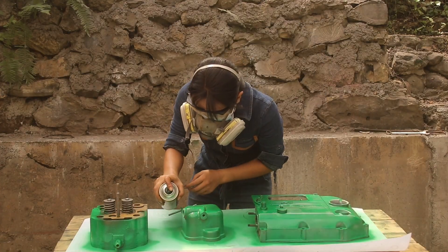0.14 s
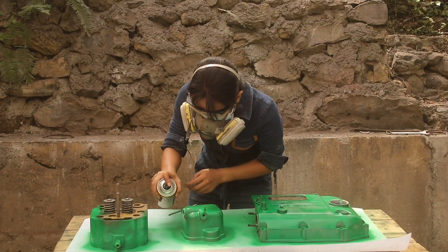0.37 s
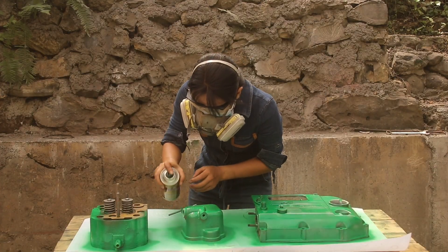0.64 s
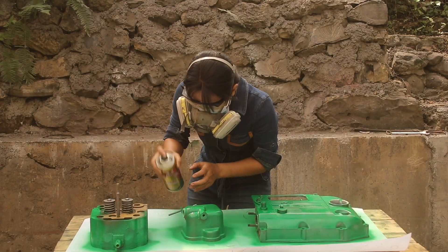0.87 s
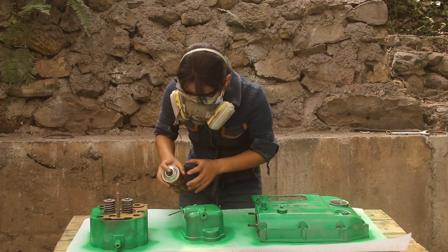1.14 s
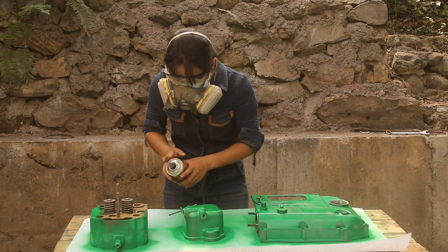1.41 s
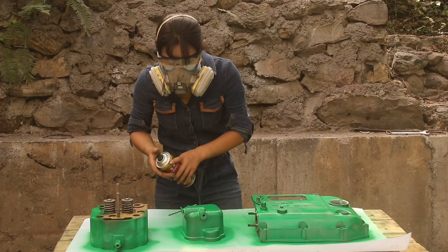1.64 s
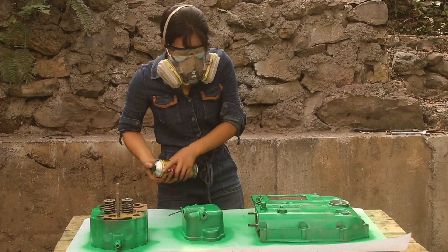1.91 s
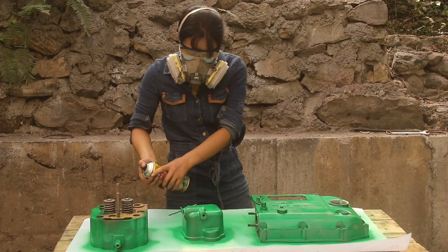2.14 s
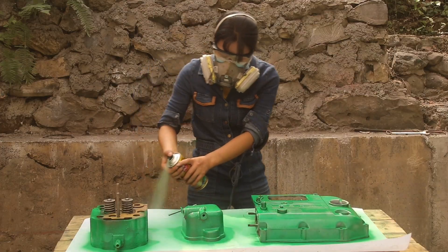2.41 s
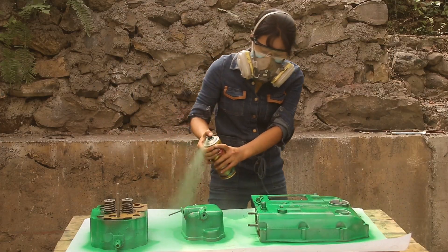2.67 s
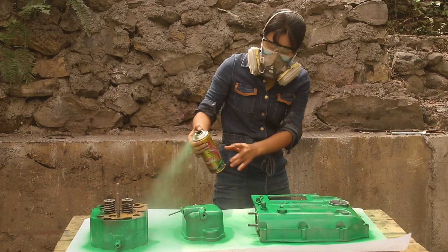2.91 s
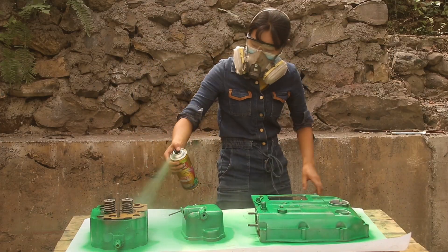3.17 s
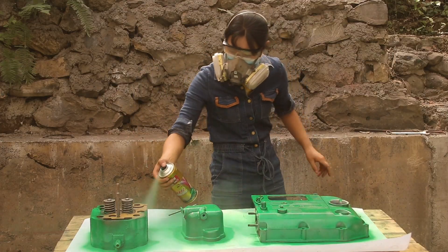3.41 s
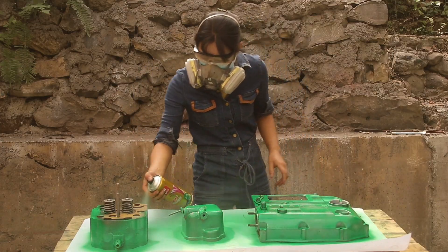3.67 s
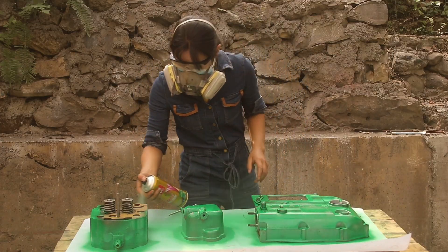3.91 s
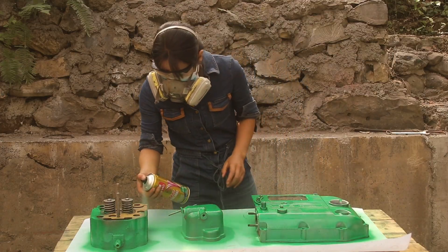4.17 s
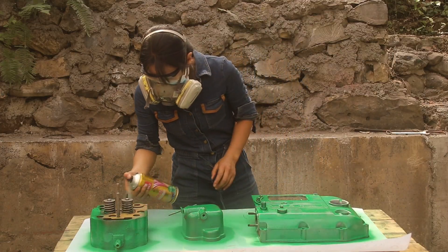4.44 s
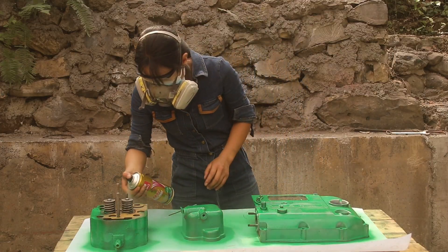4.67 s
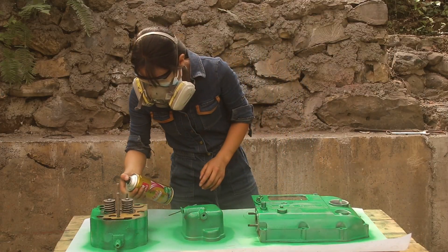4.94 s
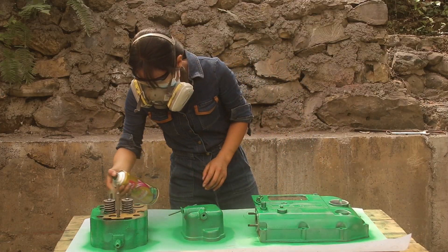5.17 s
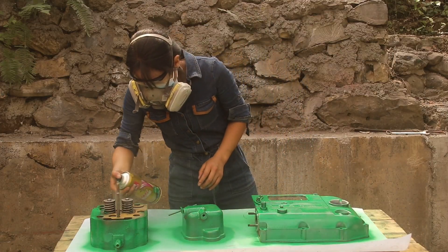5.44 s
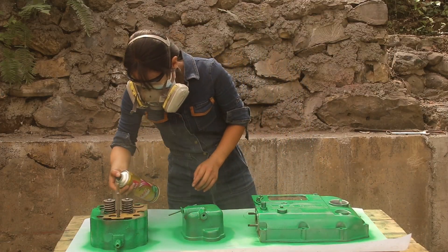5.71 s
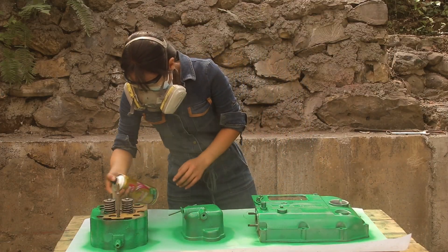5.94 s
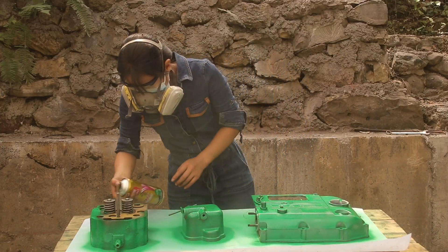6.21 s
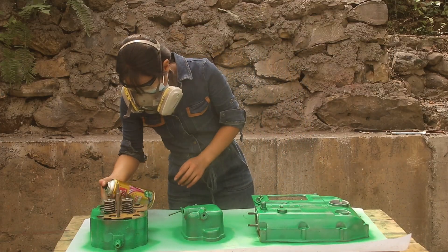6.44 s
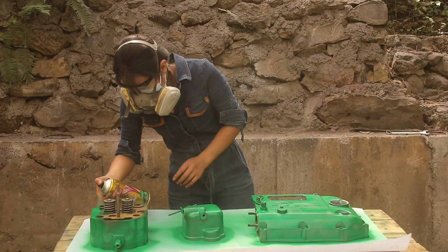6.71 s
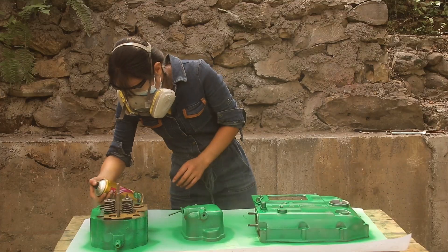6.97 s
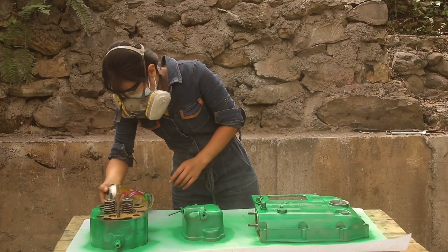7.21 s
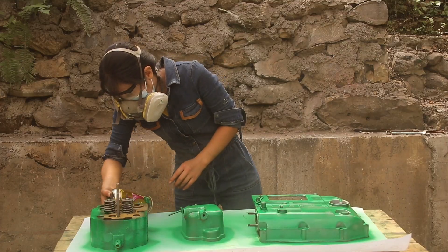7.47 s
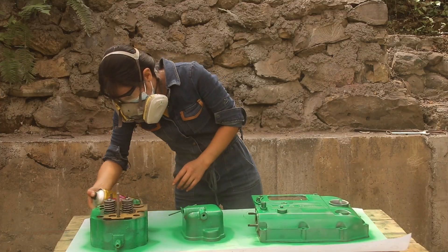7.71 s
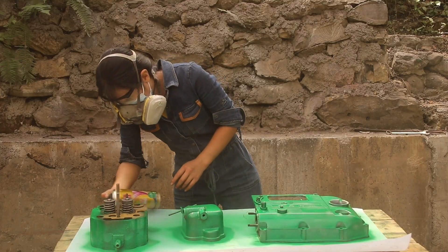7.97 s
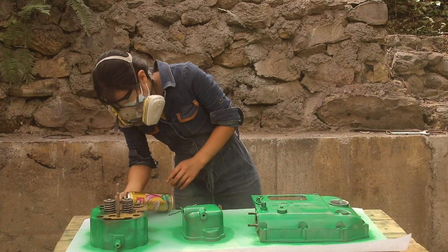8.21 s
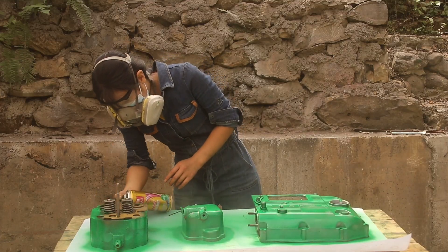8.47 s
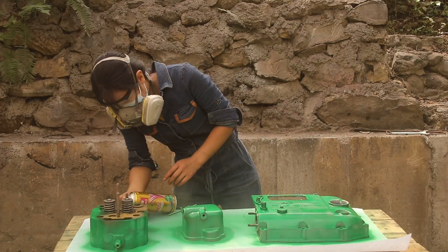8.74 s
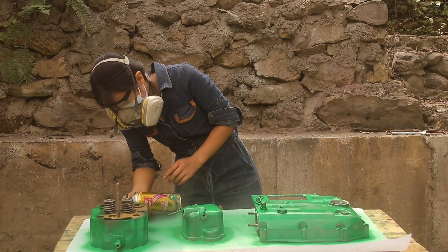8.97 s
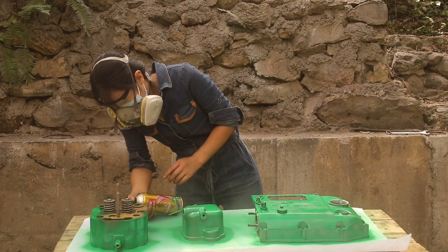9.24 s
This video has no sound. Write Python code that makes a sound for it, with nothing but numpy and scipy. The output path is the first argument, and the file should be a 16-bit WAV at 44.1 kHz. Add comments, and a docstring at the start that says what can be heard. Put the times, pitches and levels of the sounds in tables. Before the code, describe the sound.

Outdoors by a stone wall, a faint hiss gives way to an aerosol can being shaken: the steel ball knocks, skids and rolls in the thin shell. After a brief lull the spray opens in steps into a steady bright hiss with small hollow gulps. Then irregular ball clacks return and continue over the hiss to the end. Close stereo microphone, short rough echoes, quiet low rumble.

```python
"""A faint hiss, then the mixing ball knocks, skids and rolls inside a spray can of paint.
The hiss drops very low, returns in steps and goes on over more knocks. Ringing modes and short noises
make the ball; noise in bands makes the spray. A table and a stone wall answer with echoes; below lie a
quiet outdoor rumble, a faint steady microphone hiss and a wavering hum."""
import sys
import numpy as np
from scipy import signal
from scipy.io import wavfile
from scipy.ndimage import map_coordinates

SR = 44100
rng = np.random.default_rng(int(sys.argv[2]) if len(sys.argv) > 2 else 0)


def natural_amplitude(level_db):
    """Convert a level in decibels to a linear amplitude factor, elementwise."""
    exponent = np.asarray(level_db, float) / 20
    return 10 ** exponent


def output_pcm(signal):
    """Save a mono or channel-first signal as 16-bit PCM at the path in sys.argv[1].

    Samples are clipped to [-1, 1] before scaling.
    """
    pcm = np.clip(np.atleast_2d(signal).T, -1, 1) * 32767
    wavfile.write(sys.argv[1], SR, np.round(pcm).astype(np.int16))


N = 412776  # length in samples

# Middle pitches of the six bands in which every knock is described. A plain list [Hz].
KNOCK_BANDS_HZ = [1250, 2050, 2750, 3600, 5000, 7500]
# How alike the spray hiss is left and right. Each row: pitch in Hz, likeness (1 = the same, 0 = unrelated).
SPRAY_LIKENESS = [(60, 0.42), (180, 0.24), (550, 0.86), (1650, 0.87), (4970, 0.31), (15000, 0.28)]
# How alike rumble and steady hiss are left and right. Each row: pitch in Hz, likeness (1 = the same, 0 = unrelated).
BACKGROUND_LIKENESS = [(60, 0.46), (180, 0.53), (550, 0.88), (1650, 0.03), (4970, 0.11), (15000, 0.088)]


def rms_one(x):
    """Scale to an average strength (rms) of 1."""
    return x / np.sqrt(np.mean(x ** 2) + 1e-20)


def in_time(rows):
    """Draw straight lines between the rows of a table, giving each column sample by sample."""
    s, *columns = np.transpose(rows)
    return [np.interp(np.arange(N) / SR, s, c) for c in columns]


def at_hz(points, hz):
    """Read a table between its pitches, which are spaced as the ear hears them (by ratio)."""
    table_hz, values = np.array(points)[:, 0], np.array(points)[:, 1]
    return np.interp(np.log(hz), np.log(table_hz), values)


def drift(rate_hz):
    """Slow random wandering of rms 1: noise smoothed to below about rate_hz."""
    step = 40  # samples from one drawn point to the next
    r = np.exp(-2 * np.pi * step * rate_hz / SR)
    points = rng.standard_normal(N // step + 2002)
    slow = signal.lfilter([1], [1, -2 * r, r * r], points)[2000:]
    return np.interp(np.arange(N) / step, np.arange(len(slow)), rms_one(slow))


def ring(force, hz, t60):
    """A resonance: a click of size 1 starts a sine of height 1 that falls by 60 dB in t60 seconds."""
    r, w = natural_amplitude(-60 / (t60 * SR)), 2 * np.pi * hz / SR
    return signal.lfilter([0, np.sin(w)], [1, -2 * r * np.cos(w), r * r], force + 1e-18)


def fade(clicks, t60):
    """Every click starts an envelope that falls by 60 dB in t60 seconds."""
    return signal.lfilter([1], [1, -natural_amplitude(-60 / (t60 * SR))], clicks + 1e-18)


def banded_noise(spectrum, likeness, patchy_db, count):
    """Stereo noise of rms 1 in bands (count an octave), each with its own level, flicker and likeness."""
    low_hz, high_hz = spectrum[0][0], min(spectrum[-1][0], 16500)
    edges = low_hz * 2 ** np.arange(0, np.log2(high_hz / low_hz) + .2, 1 / count)
    out, together, white = 0, drift(2.7), rng.standard_normal((2, 2, N))
    for k, (low, high) in enumerate(zip(edges, edges[1:])):
        band = signal.butter(2, [low, high], "band", fs=SR, output="sos")
        mid, side = signal.sosfilt(band, white[k % 2])
        hz = np.sqrt(low * high)
        alike = np.clip(at_hz(likeness, hz), -1, 1)
        flicker_db = patchy_db * (1.07 * together + drift(21))
        gain = natural_amplitude(at_hz(spectrum, min(hz, 15000)) + flicker_db)
        out = out + gain * (np.sqrt(1 + alike) * mid + np.sqrt(1 - alike) * side * [[1], [-1]])
    return rms_one(out)


def grains(per_s, spread_db):
    """Tiny contacts of uneven size at random moments, per_s a second on average; rms 1."""
    sizes = natural_amplitude(spread_db * np.minimum(rng.exponential(1, N), 5)) * rng.choice([-1, 1], N)
    return rms_one(sizes * (rng.random(N) < per_s / SR))


def mixing_ball():
    """The steel ball hits the shell, skids on and rolls; the small can radiates little bass."""
    at, bands_db, crack_db = knocks()
    ringing, rolling = shell_modes(at, bands_db)
    push = np.zeros(N)
    push[at] = natural_amplitude(bands_db.max(axis=1))
    # after a knock the ball rolls on and slows down
    roll_dull_db, roll_bright_db, roll_t60 = -25, -30, 0.77
    dull, bright = fade(push, roll_t60) * natural_amplitude(np.array([[roll_dull_db], [roll_bright_db]])) + scrapes()
    out = ringing + cracks_and_clatter(at, bands_db, crack_db)
    out += dull * rms_one(rolling[0]) + bright * rms_one(rolling[1])
    return signal.sosfilt(signal.butter(3, 360, "high", fs=SR, output="sos"), out)


def knocks():
    """All hits of the ball: sample positions, ringing in the six bands (dB), crack over ringing (dB)."""
    # Ball on the side wall. Each row: time in seconds (sounds 1 ms later),
    # then ringing in dB near 1250, 2050, 2750, 3600 and 7500 Hz.
    wall_table = [(0.6009, -20.5, -24, -22.5, -34, -22), (0.6566, -31, -34, -29, -35, -30),
                  (0.6946, -35, -34, -39.0, -33, -35), (0.7293, -51, -36, -47, -34, -35),
                  (0.848, -37, -45, -61.0, -58.5, -55.0), (0.9007, -15, -24.5, -26, -24.5, -18.5),
                  (0.9693, -33, -23.5, -41, -25.5, -21.5), (1.0208, -26.5, -24, -42, -30.5, -38),
                  (1.049, -44, -34, -49, -44, -37), (1.064, -35, -31, -29.5, -30, -37),
                  (1.196, -20, -26, -21.0, -38, -20), (1.2407, -37, -20.5, -50, -24, -24),
                  (1.3909, -31.0, -19, -28, -24, -27.5), (1.4315, -25, -23, -59, -36, -32.5),
                  (1.4525, -34, -26, -46, -25.5, -35), (1.5168, -40, -29, -46.0, -27.5, -39),
                  (1.5359, -25.5, -27, -28, -43, -26.5), (1.594, -49, -37, -42, -40, -34),
                  (1.6259, -25, -28.5, -50, -21.5, -33), (1.6417, -40, -29.0, -40, -26.5, -24),
                  (1.7673, -29.5, -31, -38, -27.5, -31.5), (1.8918, -57, -41, -45, -35, -39.5),
                  (3.742, -28, -30, -34.5, -29.5, -32), (3.7722, -33, -22, -32.5, -23, -22),
                  (3.843, -46.5, -28, -32, -26.5, -40), (3.877, -35, -26, -31, -27, -31),
                  (4.0211, -23.5, -24, -29, -31.5, -21.5), (4.0411, -35, -49, -47, -28, -20),
                  (4.0883, -56, -24.5, -38, -33, -51), (4.1804, -52.5, -31, -44, -32, -50.5),
                  (4.245, -38, -32, -36, -41, -23.5), (4.3118, -46, -38, -42, -23, -21.5),
                  (4.333, -53, -25.5, -49, -29, -34), (4.3811, -34, -47.0, -28, -34, -32),
                  (4.397, -47.0, -40, -41, -36, -26.5), (4.5968, -27, -23, -24.5, -26.0, -18),
                  (4.6431, -27, -27, -30, -22.5, -26), (4.867, -24, -28, -25, -25, -20),
                  (4.8838, -28, -30, -26, -34, -33), (4.939, -41, -26, -32.5, -25.5, -26.5),
                  (5.0125, -34.5, -28, -32, -32, -25.5), (5.0846, -46, -28, -43.5, -34, -32),
                  (5.316, -32, -20.5, -29, -25, -21.5), (5.3755, -25, -18, -23, -28, -21.5),
                  (5.4285, -27, -48, -30, -26, -35), (5.458, -29.5, -26, -44, -31, -43),
                  (5.5494, -20.5, -26.5, -29, -26, -19), (5.6379, -23.5, -26, -30, -23, -29),
                  (5.698, -41, -24.5, -30, -25, -30), (5.7773, -30, -27, -24, -33, -19.5),
                  (5.8217, -41, -29.5, -24, -32, -26), (5.8473, -28, -26, -28, -29, -21),
                  (5.8874, -32.5, -33, -26.5, -25, -36), (6.1243, -44, -17, -22, -34.5, -21.5),
                  (6.132, -23, -32, -24, -22, -25), (6.4129, -24, -22.5, -24, -42, -19.5),
                  (6.4369, -31, -30, -23.5, -25, -28.5), (6.4956, -28, -23, -28, -39, -31),
                  (6.5468, -29, -42, -33, -39, -48), (6.6738, -24, -23, -19, -26, -17.5),
                  (6.7117, -23.5, -30, -42, -31, -30), (6.7407, -25.5, -28, -25, -27, -37),
                  (6.7945, -25.5, -29, -26, -29, -34), (6.8698, -37, -28, -23.5, -34, -24),
                  (6.9308, -39, -25, -32, -35, -35), (6.9724, -22.5, -24, -22, -23, -23),
                  (7.0244, -35.0, -26, -33, -31, -36), (7.0686, -30, -28, -32, -34, -35),
                  (7.2405, -28, -20, -24.5, -28.5, -21), (7.2882, -23.5, -18.5, -27, -25, -26),
                  (7.3475, -28, -33.5, -27, -28, -36), (7.406, -26.5, -32, -38, -36, -40),
                  (7.448, -20, -20.5, -24, -24, -30), (7.548, -25, -26.5, -21, -37, -22),
                  (7.6646, -28, -27.5, -29, -30, -46), (7.724, -35, -38, -48, -40, -33),
                  (7.8177, -28.5, -27, -41, -26.5, -36), (7.9121, -38.5, -21.5, -29, -36, -20),
                  (7.9726, -26.5, -30.5, -30, -31, -42), (8.025, -30, -17.5, -30, -20.5, -18),
                  (8.0572, -48, -23, -24, -41, -41), (8.1524, -24.5, -26.5, -33, -28, -31.5),
                  (8.198, -23, -20, -23, -28, -15), (8.2819, -24, -25, -30, -22.5, -30),
                  (8.3188, -42, -25, -26, -37, -36), (8.335, -36.5, -32, -32, -32, -34),
                  (8.7274, -31.5, -21, -27.5, -31, -25), (8.7877, -40, -26, -37, -31, -21),
                  (8.8223, -34, -31, -33, -34, -40), (8.9208, -38, -20.5, -27, -33, -22),
                  (8.9792, -35, -28, -34, -29, -56), (9.0257, -37, -37, -40, -36, -47),
                  (9.1986, -51, -29, -38, -35, -24.5), (9.2043, -56, -26, -34, -48, -50),
                  (9.283, -47.5, -29, -43, -52, -35.5), (9.3037, -54, -43, -41, -34, -30)]
    # Ball on the domed bottom, hard and bright. Each row: time in seconds (sounds 1 ms later),
    # then ringing in dB near 1250, 2050, 2750, 3600, 5000 and 7500 Hz.
    dome_table = [(1.1304, -31, -33, -25, -30, -16, -21), (5.0976, -36, -30, -28, -20.5, -25, -26),
                  (7.1523, -49.5, -26, -38, -20.5, -23, -29.5), (7.7628, -40, -21, -28, -27, -28, -23),
                  (7.7695, -40, -28, -34, -31, -30, -25), (9.0455, -52, -39, -52, -47, -38, -30)]
    wall, dome = np.array(wall_table), np.array(dome_table)
    wall = np.insert(wall, 5, wall[:, 4] - 9, axis=1)  # 5000 Hz: 9 dB weaker than 3600 Hz
    rows = np.r_[wall, dome]
    wall_crack_db, dome_crack_db = -1.5, 8  # the stiff dome cracks harder
    crack_db = np.repeat([wall_crack_db, dome_crack_db], [len(wall), len(dome)])
    return np.round((rows[:, 0] + .001) * SR).astype(int), rows[:, 1:], crack_db


def shell_modes(at, bands_db):
    """Knocks and skids ring the shell's modes; rolling contacts ring them too, as dull and bright parts."""
    # Steel shell damped by paint and hand. Each row: pitch in Hz, level in dB,
    # time to fall by 60 dB in seconds (before the limits below).
    shell = [(450, -25, 0.14), (829, -25, 0.27), (1133, -34, 0.16), (1217, -22, 0.05), (1358, -15, 0.023),
             (1532, -16, 0.03), (1725, -16, 0.042), (1973, -11.5, 0.044), (2145, -7.5, 0.031),
             (2400, -15, 0.02), (2680, -11, 0.032), (2990, -8.5, 0.016), (3260, -9.5, 0.018),
             (3640, -9.5, 0.027), (4270, -7.5, 0.012), (4910, -11.5, 0.044), (5160, -12, 0.019),
             (5970, -14.5, 0.038), (6580, 4.5, 0.0054), (7140, 0.5, 0.0091), (7550, -2, 0.011),
             (8800, 7.5, 0.0013), (10100, -8.5, 0.03), (12660, -7.5, 0.0045)]
    skid_db, skid_t60, uneven_db, split = -28.5, 0.12, 5.0, .005  # split: share of the pitch
    chance = rng.standard_normal((len(at), len(shell), 2))
    skid, roll = grains(1500, 3), grains(2500, 3) * natural_amplitude(3 * drift(25))
    out, rolling = np.zeros(N), np.zeros((2, N))
    for k, (hz, db, t60) in enumerate(shell):
        t60 = min(t60, .09, 230 / hz)  # high modes die within a few hundred cycles
        colour = np.array([np.interp(np.log(hz), np.log(KNOCK_BANDS_HZ), row) for row in bands_db])
        for twin, side in enumerate([-1, 1]):  # seam and paint split each mode into a beating pair
            twin_hz = hz * (1 + side * split)
            blows = np.zeros(N)
            blows[at] = natural_amplitude(colour + db + uneven_db * chance[:, k, twin])
            force = blows * (-1) ** k + natural_amplitude(skid_db) * skid * fade(blows, skid_t60)
            out += ring(force, twin_hz, t60)
            rolling[int(hz > 4500)] += natural_amplitude(db) * ring(roll, twin_hz, t60)
    return out, rolling


def cracks_and_clatter(at, bands_db, crack_db):
    """In each band a very short ring as the crack, and grainy noise for modes too dense to tell apart."""
    # Bands of the grainy noise. Each row: lower edge in Hz, upper edge in Hz.
    clatter_bands = [(900, 1550), (1850, 2280), (2450, 3050), (3350, 3850), (4650, 5450), (6200, 14000)]
    clatter_db, crack_cycles, low_crack_db = -1, 7.2, -4.5  # the lowest band starts more softly
    clatter_t60 = [0.021, 0.028, 0.052, 0.058, 0.1, 0.029]  # seconds, band by band
    strongest = bands_db.max(axis=1)
    out = np.zeros(N)
    for band, (hz, t60) in enumerate(zip(KNOCK_BANDS_HZ, clatter_t60)):
        crack, burst = np.zeros((2, N))
        crack[at] = natural_amplitude(crack_db + .75 * bands_db[:, band] + .25 * strongest)
        out += (-1) ** band * natural_amplitude(low_crack_db * (band == 0)) * ring(crack, hz, crack_cycles / hz)
        burst[at] = natural_amplitude(bands_db[:, band] + clatter_db)
        band_filter = signal.butter(2, clatter_bands[band], "band", fs=SR, output="sos")
        crowd = signal.sosfilt(band_filter, grains(2500, 3.2))
        out += rms_one(crowd) * fade(burst, t60)
    return out


def scrapes():
    """The ball scrapes hard along the wall: loudness of rolling noise with sudden start and short release."""
    # Each row: start in seconds, length in seconds, level of the dull modes in dB, of the bright modes in dB.
    scrape_table = [(0.733, 0.11, -54, -57), (1.163, 0.042, -34.5, -36), (1.249, 0.04, -32.5, -29.5),
                    (1.448, 0.03, -45, -41), (1.652, 0.04, -43, -39), (4.09, 0.046, -70, -66),
                    (4.32, 0.03, -46, -58), (5.81, 0.15, -41.5, -42), (6.212, 0.15, -59, -57),
                    (7.56, 0.057, -27, -23), (7.9, 0.029, -25, -50), (9.235, 0.034, -39, -51)]
    t, release_s = np.arange(N) / SR, 0.0057
    gains = np.zeros((2, N))
    for s, length, *db in scrape_table:
        shape = (t > s) * np.exp(-np.maximum(t - s - length, 0) / release_s)
        gains += natural_amplitude(np.array(db))[:, None] * shape
    return gains


def pings():
    """One mode of the shell sings out, as grip and paint let it: struck once and rubbed on for a moment."""
    # Each row: start in seconds, level in dB, pitch in Hz.
    ping_table = [(.6095, -28, 2236), (0.6563, -18.5, 6780), (.745, -37, 1380), (.765, -42, 1300),
                  (.785, -41, 1184), (1.0201, -31.5, 1900), (1.0211, -31, 3550), (1.045, -33.5, 1350),
                  (1.0645, -25.5, 1990), (1.0655, -30, 3630), (1.1558, -26, 1995), (1.2426, -22, 2010),
                  (1.2411, -38, 3640), (1.277, -26, 2000), (1.292, -22, 3640), (1.3904, -43, 2000),
                  (1.4541, -26, 3640), (1.5174, -34, 3640), (1.6267, -40, 3630), (1.7664, -31, 3770),
                  (4.0874, -33, 2000), (4.2567, -33, 2155), (4.3326, -30, 2180), (4.604, -25, 2135),
                  (4.869, -24.5, 2130), (4.869, -31, 3770), (5.014, -22.5, 2085), (5.46, -30, 2010),
                  (6.4378, -20, 3270), (6.7141, -29, 3340), (6.935, -31.5, 2140), (7.07, -34, 1310),
                  (7.105, -35, 1286), (7.156, -26.5, 2114), (7.7684, -33.5, 2160), (7.9, -25, 2110),
                  (8.0571, -27, 2023), (8.203, -24, 1917), (8.285, -26, 3640), (8.7264, -21, 2180),
                  (8.7874, -24, 2160), (8.824, -35, 2025), (8.9226, -22, 2170), (8.981, -28, 2040),
                  (9.1984, -21, 2183)]
    cycles, skid_db = 120, -11  # cycles to die away; small contacts keep the mode alive and rough
    out, size = np.zeros(N + SR), round(.3 * SR)
    shape = (len(ping_table), size)
    rubs = rng.standard_normal(shape) * (rng.random(shape) < .03)
    for (s, db, hz), rub in zip(ping_table, rubs):
        blow = np.zeros(size)
        blow[0] = natural_amplitude(db)
        force = blow + natural_amplitude(skid_db) * rub * fade(blow, 0.098)
        i = round(s * SR)
        out[i:i + size] += ring(force, hz, min(cycles / hz, .13))
    return out[:N]


def broadband_clicks():
    """Very short broadband clicks with some bass, as where a loud knock overloads the microphone."""
    # Each row: start in seconds, level in dB.
    click_table = [(0.6019, -16), (0.9022, -13), (0.9717, -10), (1.1315, -8.5), (4.0222, -17), (4.598, -15),
                   (4.886, -14), (5.0992, -13), (6.1255, -18), (6.1335, -13), (6.6748, -13), (7.7634, 0.5),
                   (8.0277, -9.5)]
    clicks = np.zeros(N)
    for s, db in click_table:
        clicks[round(s * SR)] = natural_amplitude(db)
    return ring(clicks, hz=5400, t60=.0018)


def slosh():
    """Hollow gulps, probably paint shifting in the can, and dull bumps: swelling, fading, wobbly sines."""
    # Gulps. Each row: start in seconds, level in dB.
    gulp_table = [(2.587, -28.5), (2.789, -26), (2.821, -27), (2.859, -31.5), (2.895, -30)]
    # The two hollow pitches of a gulp. Each row: pitch in Hz (before a random shift), level in dB.
    gulp_pitches = [(440, 0), (770, -4)]
    # Bumps. Each row: start in seconds, level in dB, top pitch in Hz.
    bump_table = [(6.662, -21, 401.5)]
    # The tones of a bump. Each row: share of the top pitch, level in dB.
    bump_body = [(0.96, -1), (0.5, -10), (0.66, -15)]
    rise_s, t60, gulp_spread = 0.01, 0.1, .11  # spread: share by which gulp pitches stray
    out, t = np.zeros(N), np.arange(round(.12 * SR)) / SR
    tones = [(s, db + less_db, hz * (1 + gulp_spread * rng.standard_normal()))
             for s, db in gulp_table for hz, less_db in gulp_pitches]
    tones += [(s, db + less_db, hz * share) for s, db, hz in bump_table for share, less_db in bump_body]
    swell = (1 - np.exp(-t / rise_s)) * natural_amplitude(-60 * t / t60)
    for s, db, hz in tones:
        wobble = 1.68 * np.cumsum(rng.standard_normal(len(t))) / np.sqrt(SR * 0.011)
        i = round(s * SR)
        out[i:i + len(t)] += natural_amplitude(db) * swell * np.sin(2 * np.pi * hz * t + wobble)
    return out


def spray():
    """Paint hisses from the nozzle: a bright jet and a breathy middle, both noise, plus their table echo."""
    # Colour of the jet. Each row: pitch in Hz, level in dB per Hz (only the differences count).
    jet_colour = [(2060, -37), (3500, 5), (6620, -12), (7230, 9), (9460, 6.5), (11800, 9), (13700, 2.5),
                  (15600, 6.5)]
    # Colour of the breathy middle. Each row: pitch in Hz, level in dB per Hz (only the differences count).
    middle_colour = [(530, -8), (900, -14.5), (1040, -14), (1120, -9.5), (1210, -5.5), (1360, -4),
                     (1490, -6.5), (1900, -3), (2420, 4), (2900, -5.5), (5000, 3), (6500, 5), (11000, -120)]
    jet_gain, middle_gain = nozzle()
    jet = jet_gain * banded_noise(jet_colour, SPRAY_LIKENESS, patchy_db=1.2, count=4)
    breath = banded_noise(middle_colour, SPRAY_LIKENESS, patchy_db=.3, count=5)
    return off_table(jet + middle_gain * (breath + hollow()))


def nozzle():
    """The finger on the nozzle sets the gains of jet and middle: eased steps, then a slow sag of pressure."""
    # Each row: start in seconds, level of the jet in dB, level of the breathy middle in dB.
    valve = [(0, -42.5, -57), (.6, -56, -92), (2.05, -37.5, -47.5), (2.28, -31, -40.5), (2.39, -31, -35)]
    ease_s, jet_sag, middle_sag = 0.017, 0.33, 0.26  # seconds, dB per second, dB per second
    s, *levels_db = np.transpose(valve)
    t, r = np.arange(N) / SR, np.exp(-1 / (ease_s * SR))
    steps = natural_amplitude(np.array(levels_db))[:, np.searchsorted(s[1:], t)]
    start = steps[:, :1]
    eased = signal.lfilter([1 - r], [1, -r], steps - start) + start
    return eased * natural_amplitude(-np.outer([jet_sag, middle_sag], np.maximum(t - s[-1], 0)))


def hollow():
    """A hollow band in the hiss shifts as the jet turns toward the parts: noise on a moving centre pitch."""
    # Each row: time in seconds, centre in Hz, level over the breathy middle in dB.
    hollow_table = [(2.4, 2243, -7), (3.0, 2329, -8.5), (3.5, 2370, -9.5), (4.5, 2406, -3), (5.9, 2565, -7),
                    (6.4, 2640, -3), (6.9, 2690, -5.5), (7.5, 2596, -11), (8.5, 2535, -2.5),
                    (9.36, 2550, -5)]
    width_hz = 820
    hz, db = in_time(hollow_table)
    low_pass = signal.butter(2, width_hz / 2, fs=SR, output="sos")
    slow = signal.sosfilt(low_pass, rng.standard_normal((2, 3, N)))
    turn = 2 * np.pi * np.cumsum(hz) / SR
    band = slow[0] * np.cos(turn) + slow[1] * np.sin(turn)
    return natural_amplitude(db) * rms_one(band[1:] + 0.17 * band[0])  # band[0] is shared by left and right


def off_table(x):
    """The table top returns a dulled hiss half a cycle of the gap pitch late, which weakens that pitch."""
    # Each row: time in seconds, pitch of the gap in Hz.
    gap_table = [(2.3, 3570), (2.6, 4140), (2.9, 4960), (3.08, 3670), (3.3, 4100), (3.5, 4500), (3.7, 4730),
                 (5.0, 4600), (6.0, 4250), (6.3, 4860), (7.4, 4360), (9.36, 4530)]
    echo_db, echo_hz = -8, 6500  # strength and upper edge of the echo
    hz, = in_time(gap_table)
    dull = signal.sosfilt(signal.butter(1, echo_hz, fs=SR, output="sos"), x)
    delay = SR / (2 * hz) - SR / (2 * np.pi * echo_hz)  # the dulling itself delays a little
    late = np.arange(N) - np.maximum(delay, 0)
    return x + natural_amplitude(echo_db) * np.array([np.interp(late, np.arange(N), side) for side in dull])


def table_and_wall(x):
    """Echoes scattered by rough stone, then a diffuse tail; three random patterns take turns smoothly."""
    # Table and wall. Each row: delay in seconds, level in dB.
    echoes = [(.0065, -5), (.0095, -25), (0.013, -17)]
    smear_s, tail_db, tail_t60, dull_hz, count = .0016, -28.0, 0.4, 13500, 3
    t = np.arange(round(.3 * SR)) / SR
    shape = natural_amplitude(tail_db - 60 * t / tail_t60) * (t > .004)
    for delay, db in echoes:
        shape = shape + natural_amplitude(db) * np.exp(-((t - delay) / smear_s) ** 2) / np.sqrt(smear_s * SR)
    high_pass = signal.butter(2, 800, "high", fs=SR, output="sos")
    low_pass = signal.butter(1, dull_hz, fs=SR, output="sos")
    out, sweep = 0, 2 * np.pi * 1.3 * np.arange(N) / SR
    for k in range(count):
        shared, own = rng.standard_normal(len(t)), rng.standard_normal((2, len(t)))
        own = signal.sosfilt(high_pass, own)  # long waves reach both sides alike
        answer = signal.sosfilt(low_pass, shape * (0.18 * shared + 0.58 * own))
        share = np.cos(sweep + np.pi * k / count) * np.sqrt(2 / count)  # constant power in total
        out = out + signal.fftconvolve((share * x)[None], answer, axes=1)[:, :N]
    return out


def placed(x):
    """The can moves left: the left microphone hears it a little earlier, the right one louder."""
    # Each row: time in seconds, lead of the left microphone in samples, left over right in dB.
    place = [(0, 0.5, -2), (3, 0.25, -2), (4.5, 1.23, -2.2), (9.36, 1.2, -2)]
    lead, pan_db = in_time(place)
    late = map_coordinates(x[1], [np.arange(N) - lead], order=5, mode="nearest")
    return np.array([x[0] * natural_amplitude(pan_db / 2), late * natural_amplitude(-pan_db / 2)])


def rumble():
    """Quiet outdoor rumble: mostly low noise in flickering bands."""
    # Each row: pitch in Hz, level in dB per Hz (only the differences count).
    yard_colour = [(15, -48), (25, -13), (108, -5), (165, -6.5), (229, -10), (289, -0.5), (350, -4.5),
                   (459, 1), (589, -12.5), (687, -6.5), (2500, -18.5), (3250, -38), (5500, -120)]
    return natural_amplitude(-48.5) * banded_noise(yard_colour, BACKGROUND_LIKENESS, patchy_db=-2.0, count=3)


def microphone_hiss():
    """Faint steady hiss of the microphone: noise in gently flickering bands."""
    # Each row: pitch in Hz, level in dB per Hz (only the differences count).
    hiss_colour = [(600, -45), (1000, -2), (2500, 1.5), (5000, -4.5), (8000, -2.5), (12000, -9),
                   (15600, -16)]
    return natural_amplitude(-44.5) * banded_noise(hiss_colour, BACKGROUND_LIKENESS, patchy_db=.4, count=4)


def hum():
    """A faint wavering hum far off: noise through one narrow resonance."""
    pitch_hz, width_hz, hum_db = 197, 11.5, -63.5
    return natural_amplitude(hum_db) * rms_one(ring(rng.standard_normal(N), pitch_hz, 3.5 / width_hz))


def scene():
    """Can, spray and echoes stand at the can's place; rumble, steady hiss and hum are added beneath."""
    can = mixing_ball() + pings() + broadband_clicks() + slosh()
    return placed(can + table_and_wall(can) + spray()) + rumble() + microphone_hiss() + hum()


def top_cut(x):
    """Nothing passes above the cut-off."""
    return signal.sosfilt(signal.butter(12, 16830, fs=SR, output="sos"), x)


def record(dry):
    """The microphone housing dips near 5 kHz, peaks beyond full scale are clipped, the top is cut."""
    band = signal.sosfilt(signal.butter(1, [4100, 5900], "band", fs=SR, output="sos"), dry)
    clipped = np.clip(dry - 0.31 * band, -1, 1)  # 0.31: share of the band that is lost
    finished = signal.sosfilt(signal.cheby2(10, 40, 16100, fs=SR, output="sos"), clipped)
    return top_cut(finished)


dry = scene()
out = record(dry)
output_pcm(out)
```